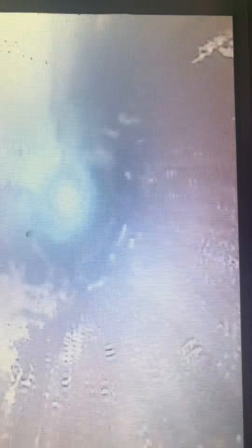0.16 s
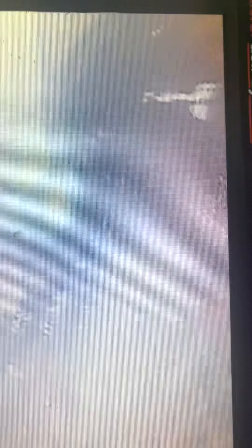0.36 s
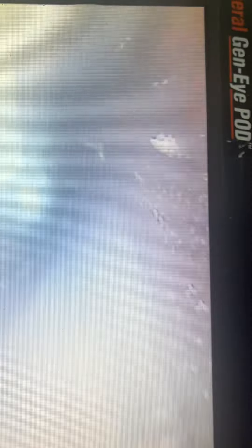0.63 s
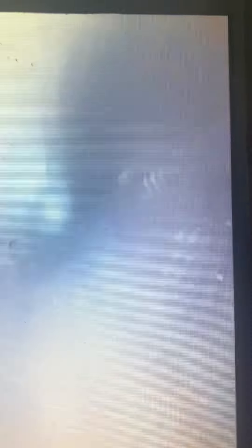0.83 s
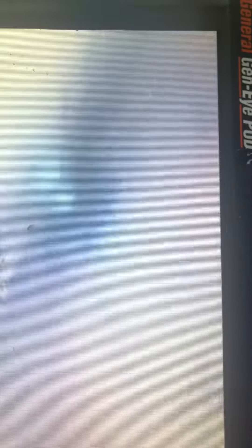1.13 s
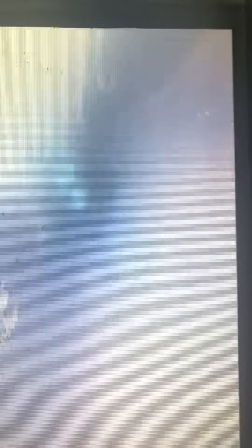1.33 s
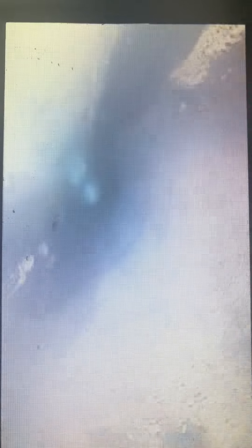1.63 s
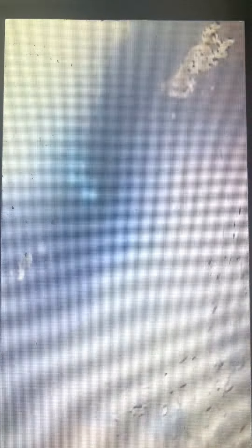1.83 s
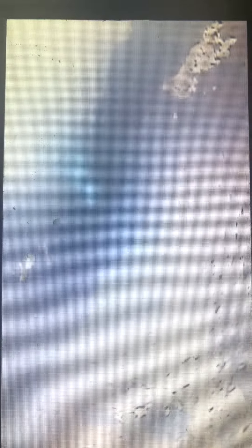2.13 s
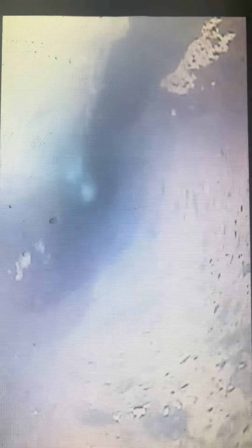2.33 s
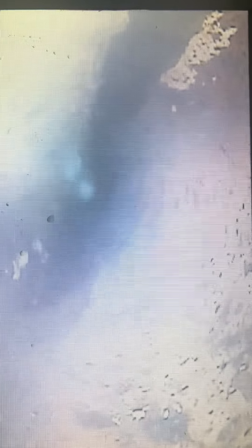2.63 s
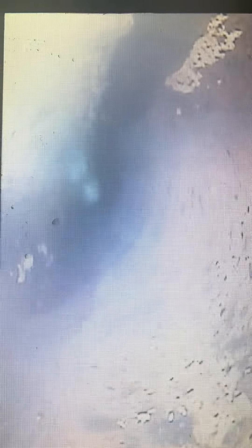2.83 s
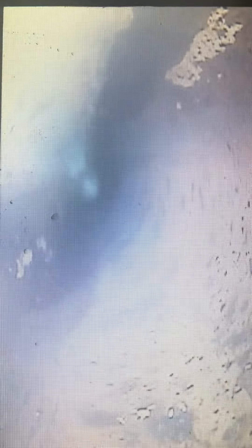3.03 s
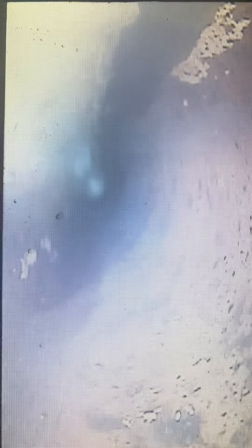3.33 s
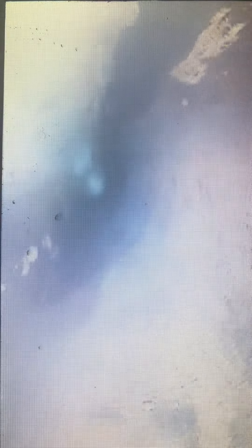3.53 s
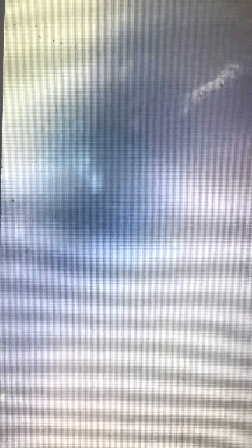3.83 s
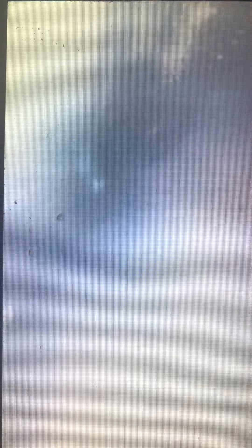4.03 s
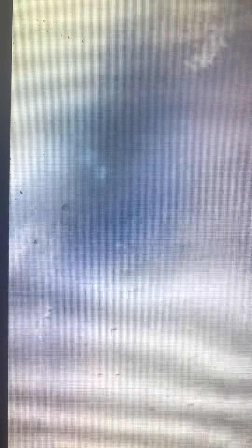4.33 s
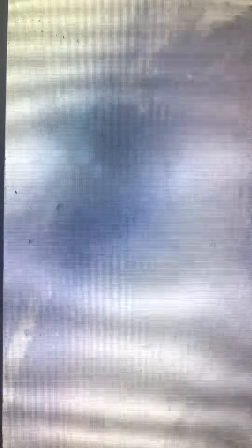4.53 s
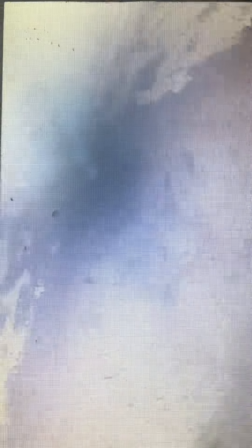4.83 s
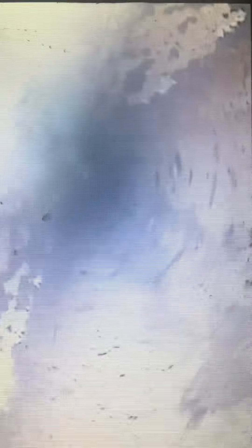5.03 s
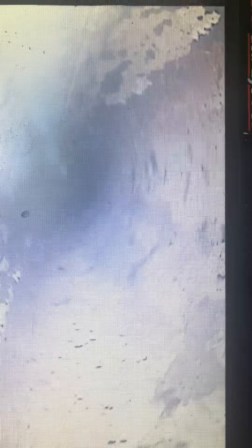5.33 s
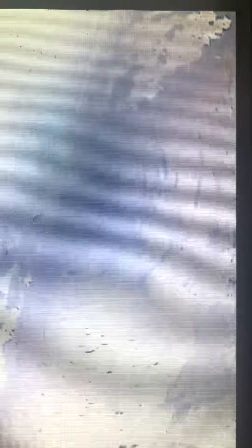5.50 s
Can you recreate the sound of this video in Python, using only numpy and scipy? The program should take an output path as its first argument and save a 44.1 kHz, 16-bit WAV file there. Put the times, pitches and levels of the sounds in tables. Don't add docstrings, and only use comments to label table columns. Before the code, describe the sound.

A stiff wet cable is dragged by hand along a drain pipe, captured close with uneven stereo colour. Low rumble with a hollow hum and soft steady hiss run throughout, with faint bubbles, drops and wet ticks. From 0.2 to 1.5 seconds the first pull rubs with a dull, grainy rasp around the low mids, catching in quick throbs; knocks crowd together around 0.7 to 0.95, with more at 1.4 and 1.5. It settles, leaving light hand rustles and separate hollow clacks near 2.3 and 2.5. Around 3 seconds it is nearly still, with faint catches. At 3.8 a very bright wet snap and the hardest thud strike together, starting the second pull, which groans and throbs strongest from 4.0 to 4.5 with singing pipe tones. A heavy booming knock lands at 4.6, another double knock at 5.1, and a last clack at 5.57 as the rubbing fades.

```python
import sys
import numpy as np
from scipy import signal
from scipy.fft import rfft, irfft, next_fast_len
from scipy.io import wavfile
from scipy.ndimage import uniform_filter1d

SR = 44100
rng = np.random.default_rng(int(sys.argv[2]) if len(sys.argv) > 2 else 0)


def decibels_to_gain(level_db):
    exponent = np.asarray(level_db, float) / 20
    return 10 ** exponent


def generate_wav(signal):
    frames = np.transpose(np.atleast_2d(signal))
    scaled = np.clip(frames, -1, 1) * 32767
    pcm = np.round(scaled).astype(np.int16)
    wavfile.write(sys.argv[1], SR, pcm)


N = 249606


def rms_one(x):
    return x / np.sqrt(np.mean(x ** 2) + 1e-20)


def at_hz(points, hz):
    point_hz, value = np.array(points).T[:2]
    return np.interp(np.log(hz), np.log(point_hz), value)


def bandpass(x, low_hz, top_hz, order=2):
    return signal.sosfilt(signal.butter(order, [low_hz, top_hz], "band", fs=SR, output="sos"), x)


def drift(rate):
    step = 40
    r = np.exp(-2 * step * np.pi * rate / SR)
    slow = signal.lfilter([1], [1, -2 * r, r * r], rng.standard_normal(N // step + 2002))[2000:]
    return np.interp(np.arange(N) / step, np.arange(len(slow)), rms_one(slow))


def ring(force, hz, t60):
    r = decibels_to_gain(-60 / (t60 * SR))
    w = 2 * np.pi * hz / SR
    return signal.lfilter([0, np.sin(w)], [1, -2 * r * np.cos(w), r * r], force + 1e-18)


def random_clicks(per_s, spread_db):
    sizes = decibels_to_gain(spread_db * np.minimum(rng.exponential(size=(2, N)), 5))
    sizes = sizes * rng.choice([-1, 1], (2, N))
    return sizes * (rng.random((2, N)) < per_s / SR)


def struck_resonance(rows, rise_s, fall_s, cycles, trim_db):
    t = np.arange(4000) / SR
    out = np.zeros((2, N + len(t)))
    shove = (1 - np.exp(-t / rise_s)) * np.exp(-t / fall_s)
    for start, db, hz in rows:
        rough = rng.standard_normal((2, len(t))) * shove
        throb = ring(ring(rough, hz, cycles / hz), hz, cycles / hz / 4)
        at = round(start * SR)
        out[:, at:at + len(t)] += decibels_to_gain(db + trim_db) * throb / np.abs(throb).max(axis=1, keepdims=True)
    return out[:, :N]


def bursts(rows, octaves, decay_s):
    t = np.arange(700) / SR
    out = np.zeros((2, N + len(t)))
    decay = np.exp(-t / decay_s) + .2 * np.exp(-t / .009)
    for start, db, hz in rows:
        low_hz, top_hz = np.clip([hz * 2 ** -octaves, hz * 2 ** octaves], 500, 18000)
        snap = bandpass(rng.standard_normal((2, len(t))) * decay, low_hz, top_hz)
        at = round((start + 0.000896) * SR)
        out[:, at:at + len(t)] += decibels_to_gain(db + 11.0) * snap / np.abs(snap[0]).max()
    return out[:, :N]


def swells(rows, octaves):
    t = np.arange(N) / SR
    out = np.zeros((2, N))
    slips = random_clicks(3000, spread_db=2.5)
    for centre, half, db, hz in rows:
        near = np.abs(t - centre) < half
        grain = rms_one(bandpass(slips[:, near], hz * 2 ** -octaves, hz * 2 ** octaves))
        out[:, near] += decibels_to_gain(db) * (1 - ((t[near] - centre) / half) ** 2) * grain
    return out


# time in seconds, level in dB.
PULL_EFFORT = [(0.0, -46.5), (0.14, -40), (0.58, -36), (0.79, -33.5), (0.87, -31.5), (1.01, -38),
               (1.43, -35), (1.53, -50), (2.22, -43), (2.49, -54), (3.15, -62.5), (3.52, -55), (3.6, -42),
               (3.92, -33), (4.05, -28.5), (4.48, -32), (4.81, -43.5), (5.66, -58)]
# centre in seconds, half length in seconds, level in dB.
CABLE_SHIFTS = [
    (0.43, 0.072, -38),
    (1.76, 0.11, -45),
    (2.66, 0.1, -47.5),
    (2.855, 0.026, -47),
    (3.43, 0.058, -47.5),
    (4.942, 0.043, -44.5),
]
# pitch in Hz, level in dB, ring time t60 in seconds.
PIPE_MODES = [(145.4, 4, 0.29), (188.3, 1, 0.27), (211, -1.5, 0.074), (238, -4, 0.01), (336.3, 1, 0.29),
              (369.8, 6.5, 0.18), (423, 0.5, 0.13), (483.7, 13.5, 0.042), (518, -12, 0.17),
              (550.3, 2, 0.12), (611, -0.5, 0.031), (738, -13, 0.076), (695, -7, 0.0054),
              (885, -17.5, 0.053), (930.5, -17.5, 0.17), (1070, -16, 0.0088), (1185, -21.5, 0.42),
              (1216, -14.5, 0.11), (1316, -21, 0.37), (1445, -3, 0.026), (1680, -10.5, 0.022),
              (1900, -7.5, 0.023), (1996, -12.5, 0.031), (2724, -8.5, 0.0061), (3175, -6, 0.011),
              (4600, -17.5, 0.011)]


def rubbing():
    t = np.arange(N) / SR
    power = decibels_to_gain(2 * np.interp(t, *np.transpose(PULL_EFFORT)))
    for centre, half, db in CABLE_SHIFTS:
        power = power + decibels_to_gain(2 * db) * np.clip(1 - ((t - centre) / half) ** 2, 0, 1)
    rub_db = 10 * np.log10(power)
    rasp_db = -50 + 0.59 * (rub_db + 40.5)
    drone_db = -44.5 + 0.59 * (rub_db + 43)
    slips = random_clicks(4000, spread_db=2.0) * decibels_to_gain(1.2 * drift(14))
    modes = []
    for hz, db, t60 in PIPE_MODES:
        wander = decibels_to_gain(db + 1.5 * drift(12))
        modes.append((hz, wander * rms_one(ring(slips, hz, t60))))
    drone = rms_one(sum(v for hz, v in modes if hz < 230))
    body = sum(v for hz, v in modes if 250 <= hz < 900)
    body = rms_one(bandpass(body, 310, 640, order=4))
    rasp = rms_one(sum(v for hz, v in modes if hz >= 900))
    return decibels_to_gain(rub_db - 3.5) * body + decibels_to_gain(rasp_db) * rasp + decibels_to_gain(drone_db) * drone


# frequency in Hz, level in dB per Hz.
AIR_SPECTRUM = [(25, -85), (45, -62), (70, -55.5), (100, -59), (170, -64.5), (250, -76), (500, -78),
                (1050, -91.5), (1950, -86), (2250, -87), (5500, -83.5), (7000, -86.5), (14000, -89.5),
                (16000, -97)]


def background():
    hz = np.maximum(np.fft.rfftfreq(N, 1 / SR), 1)
    air = rms_one(irfft(rfft(rng.standard_normal((2, N))) * decibels_to_gain(at_hz(AIR_SPECTRUM, hz)), N))
    rumble = signal.sosfiltfilt(signal.butter(2, 800, fs=SR, output="sos"), air)
    hiss = air - rumble
    hum = rms_one(ring(air, 79, 0.42) + 1.2 * ring(air, 95, 0.4))
    rumble = rumble + decibels_to_gain(-6.0) * hum
    hiss = hiss - decibels_to_gain(-6.0) * hum
    return decibels_to_gain(-36.5) * (rumble * decibels_to_gain(1.2 * drift(5.5)) + hiss * decibels_to_gain(.8 * drift(22)))


def trickle():
    pops = random_clicks(260, spread_db=2.5) * decibels_to_gain(4.9 * drift(3.7))
    pitches = np.geomspace(2100, 15000, 14)
    dealt = rng.integers(0, len(pitches), N)
    cycles = 40
    return decibels_to_gain(-61) * rms_one(sum(ring(pops * (dealt == k), hz, cycles / hz) for k, hz in enumerate(pitches)))


def faint_ticks():
    decay = np.exp(-1 / (.0012 * SR))
    level = signal.lfilter([1], [1, -decay], np.abs(random_clicks(30, spread_db=2.2)[0]))
    high = signal.butter(2, 3000, "high", fs=SR, output="sos")
    return decibels_to_gain(-64.0) * level * signal.sosfilt(high, rng.standard_normal((2, N)))


# start in seconds, peak level in dB, pitch in Hz.
WET_SPECKS = [(0.0323, -41.5, 4000), (0.0787, -39.5, 4130), (0.2977, -45, 4000), (0.7198, -41, 3900),
              (0.762, -43.5, 4800), (0.8785, -39, 3300), (0.933, -36, 3000), (0.946, -41, 4100),
              (1.056, -50, 4000), (1.1932, -40, 4300), (1.255, -44, 7600), (1.4102, -35.5, 8200),
              (1.4596, -42, 8000), (1.498, -42, 7900), (1.5229, -41.5, 4000), (1.6232, -44, 8250),
              (2.0527, -44, 8250), (2.1685, -42.5, 9400), (2.5262, -40, 7750), (2.528, -44, 14000),
              (2.543, -41, 14500), (2.543, -44, 8500), (2.657, -46, 9500), (2.75, -47, 4400),
              (2.862, -48, 7500), (3.1637, -45, 3980), (3.2141, -44, 4200), (3.4326, -47, 4000),
              (3.4805, -43.5, 8300), (3.675, -42, 4200), (3.975, -44, 9800), (4.4139, -42, 8800),
              (4.4912, -45, 9100), (4.5226, -52, 4000), (4.591, -42, 8300), (4.7172, -43, 4200),
              (5.033, -44.5, 3800), (5.09, -38, 3100), (4.591, -41, 3300), (5.2719, -46, 9100)]


def specks():
    return bursts(WET_SPECKS, octaves=0.5, decay_s=0.0022)


# start in seconds, peak level in dB.
GRIT_CRACKS = [(0.068, -36), (0.1735, -37.5), (0.335, -35.5), (0.4357, -38.5), (0.608, -39.5), (0.873, -32),
               (0.9196, -37.5), (1.39, -37), (1.41, -39.5), (1.644, -38), (2.089, -39.5), (3.024, -41),
               (3.8382, -28.5), (4.5902, -39), (5.088, -32.5), (5.353, -38.5), (0.95, -46)]


def grit():
    return bursts([(*row, 4300) for row in GRIT_CRACKS], octaves=.75, decay_s=.0022)


# start in seconds, peak level in dB.
FILM_SNAPS = [
    (0.177, -48),
    (0.271, -32.5),
    (0.336, -39),
    (0.574, -37),
    (1.19, -36),
    (1.711, -36),
    (2.3595, -39),
    (2.956, -33.5),
    (3.783, -35.5),
    (3.8145, -21),
]


def film_snaps():
    return bursts([(*row, 10600) for row in FILM_SNAPS], octaves=1, decay_s=0.0014)


# centre in seconds,
# half length in seconds, level in dB, pitch in Hz.
HAND_RUSTLES = [(0.3, .1, -58, 8000), (0.9, .07, -60, 4500), (1.22, .05, -51, 3900), (1.45, .08, -55, 8200),
                (1.982, 0.089, -56, 1550), (2.15, .08, -60, 8500), (2.25, .06, -56, 1450),
                (2.7, .06, -53, 8500), (2.72, 0.093, -61, 4300), (2.75, .13, -60, 1900),
                (3.5, .06, -60, 8500), (3.7, .12, -53, 4300), (3.7, .12, -56, 8500), (3.72, .08, -56, 1400),
                (4.3, .25, -52, 1050), (4.25, 0.27, -56, 1950), (5.28, .08, -59, 8500),
                (0.45, 0.17, -51, 760), (1.15, 0.24, -47, 556), (3.1, 0.089, -54, 680),
                (3.65, 0.22, -45, 50), (4.75, .2, -50, 48), (0.75, .25, -50, 48), (3.9, .1, -42, 150),
                (3.68, .12, -60, 2100), (1.3, .1, -62, 2600), (2.05, .1, -58, 2400), (5.15, .06, -54, 1530),
                (2.4, .06, -53, 450)]


def hand_rustles():
    return swells(HAND_RUSTLES, octaves=0.22)


# start in seconds, peak level in dB, pitch of the contact in octaves above the
PIPE_KNOCKS = [(0.246, -18.5, 2.43, 0.44), (0.368, -32, 1.2, 0.46), (0.433, -23.5, 1.34, 0.51),
               (0.574, -22.5, 0.97, 0.42), (0.723, -19.5, 0.37, 2.7), (0.768, -12, 0.48, 0.67),
               (0.826, -16, 0.86, 0.73), (0.874, -24.5, 0.22, 2), (0.923, -19, 0.17, 1),
               (0.948, -27.5, 1.9, 2.4), (1.056, -23.5, 1.3, 0.65), (1.095, -26, 1.36, 0.67),
               (1.233, -27.5, 1.2, 0.49), (1.389, -17.5, 0.86, 0.89), (1.47, -21, 1.76, 0.82),
               (1.623, -39.5, 3.9, 1), (1.848, -33, 1.9, 0.73), (2.121, -30, 0.78, 1.53),
               (2.311, -23, 2.1, 12), (2.459, -21.5, 1.73, 0.74), (2.801, -34.5, 2.1, 0.57),
               (3.177, -30, 1.15, 1.28), (3.839, -17, 3.1, 2.5), (4.396, -28, 1.2, 0.3),
               (4.591, -17.5, 0.23, 2.33), (4.824, -41, 2.2, 0.9), (5.086, -16, 1.17, 0.97),
               (5.123, -22, 1.72, 0.64), (5.293, -38, 2.1, 0.58), (5.57, -24, 2.47, 1.6)]
GROUP_PITCH = [0, 1.2, 2.2, 3.2]


def knocks():
    start_s, peak_db, pitch, breadth = np.transpose(PIPE_KNOCKS)
    breadth = np.maximum(breadth, .2)
    colour = [-20 * np.log10(1 + ((at - pitch) / breadth) ** 2) for at in GROUP_PITCH]
    t = np.arange(7000) / SR
    rough = rng.standard_normal((len(start_s), 2, len(t)))
    chance = rng.standard_normal((len(start_s), 2, len(PIPE_MODES)))
    far = np.clip((colour[3] + 11) / 7, 0, 1)
    groups = np.zeros((4, len(start_s), 2, len(t)))
    for m, (hz, db, t60) in enumerate(PIPE_MODES):
        late = max(6.0 / hz - .0105, 0) + .007 * far * np.clip((1400 - hz) / 600, 0, 1)
        since = np.maximum(t - late[:, None, None], 0)
        contact = (1 - np.exp(-since / 0.000093)) * np.exp(-since * (70 + 0.022 * hz))
        rung = ring(rough * contact, hz, 0.71 * t60)
        rung = rung / np.abs(rung).max(axis=2, keepdims=True)
        groups[np.searchsorted([250, 600, 1100], hz)] += decibels_to_gain(db + 2.0 * chance[..., m, None]) * rung
    out = np.zeros((2, N + len(t)))
    lifts_db = [0.2, 3.8, 0.25, 4.05]
    bands_hz = [(90, 260), (300, 720), (600, 1500), (1000, 3300)]
    for group, rel_db, lift_db, band in zip(groups, colour, lifts_db, bands_hz):
        group = bandpass(group, *band)
        loudest = np.sqrt(uniform_filter1d(group ** 2, size=600).max(axis=2, keepdims=True))
        group = group / loudest * decibels_to_gain(peak_db + rel_db + lift_db - 8.5)[:, None, None]
        for start, knock in zip(start_s, group):
            at = round((start - .0015) * SR)
            out[:, at:at + len(t)] += knock
    return out[:, :N]


# start in seconds, peak level in dB, pitch in Hz.
FIRST_CONTACTS = [(0.247, -28, 1010), (0.721, -26, 1500), (2.311, -26, 1450), (2.311, -30, 2030),
                  (2.46, -32, 760), (3.836, -23, 2030), (3.84, -25, 1300), (4.589, -25, 1570),
                  (4.59, -30, 1120), (5.084, -33, 1930), (5.568, -26, 1440), (5.568, -34, 2000),
                  (1.47, -32, 880), (1.39, -34, 2010), (0.88, -32, 1500), (1.058, -31, 620),
                  (1.3, -32, 600), (0.826, -26, 484)]


def clacks():
    return struck_resonance(FIRST_CONTACTS, rise_s=.0005, fall_s=0.0028, cycles=16.6, trim_db=-2.5)


# start in seconds, peak level in dB.
FAR_DROPS = [(0.248, -35.5), (0.856, -42), (1.0824, -40), (1.97, -42), (2.137, -38.5), (2.505, -42),
             (3.047, -41), (3.339, -46), (3.511, -45), (3.89, -39), (4.186, -40), (4.841, -42),
             (5.035, -40), (5.233, -41), (5.2905, -42)]


def drops():
    return bursts([(*row, 8650) for row in FAR_DROPS], octaves=0.76, decay_s=0.0023)


# start in seconds, peak level in dB, pitch in Hz.
PIPE_BOOMS = [(0.25, -32.5, 150), (1.1, -28, 143), (2.32, -23, 146), (3.872, -22, 150), (4.625, -17.5, 144),
              (4.61, -20, 336), (5.095, -25, 150), (5.125, -24, 190), (5.1, -23, 346), (4.1, -32, 1165),
              (3.87, -38, 1210)]


def booms():
    return struck_resonance(PIPE_BOOMS, rise_s=.003, fall_s=0.0086, cycles=31, trim_db=-3.5)


# centre in seconds, half length in seconds, level in dB, pitch in Hz.
SINGING_MODES = [(0.45, .17, -40, 550), (0.58, 0.28, -58, 2000), (1.2, 0.26, -44, 549),
                 (4.18, 0.32, -53.5, 2005), (4.22, 0.34, -52.5, 1190), (4.15, 0.28, -50.5, 1430),
                 (4.25, .3, -41.5, 470), (3.7, .13, -56, 2000), (3.5, .08, -38, 147),
                 (4.35, 0.26, -46.5, 340), (4.9, .12, -49.5, 400), (1.5, 0.056, -49.5, 1056),
                 (1.8, .15, -54, 760), (2.29, 0.11, -53, 756), (2.0, 0.26, -44, 95), (0.75, .4, -44, 96),
                 (3.94, .4, -47, 95)]


def singing():
    return swells(SINGING_MODES, octaves=0.065)


# start in seconds, peak level in dB, pitch in Hz.
SKIN_CATCHES = [(0.295, -41, 434), (0.342, -28.5, 476), (0.384, -21.5, 547), (0.464, -22, 545),
                (0.519, -22.5, 534), (0.552, -22, 493), (0.594, -22.5, 430), (0.62, -22.5, 540),
                (0.644, -19, 462), (0.674, -34, 606), (0.883, -23, 611), (1.045, -21.5, 362),
                (1.123, -26.5, 520), (1.145, -28, 386), (1.209, -37, 536), (1.287, -32, 476),
                (1.333, -31, 475), (1.658, -34, 620), (1.75, -38, 362), (2.585, -29, 468),
                (2.643, -33.5, 617), (2.683, -36, 530), (3.004, -39, 360), (3.106, -31, 537),
                (3.27, -42, 990), (3.396, -33, 492), (3.564, -32, 397), (3.603, -31.5, 464),
                (3.671, -30.5, 358), (3.737, -33, 437), (3.779, -33, 463), (3.918, -42, 460),
                (3.969, -23, 410), (4.019, -37, 510), (4.073, -21.5, 466), (4.114, -20, 466),
                (4.144, -15, 459), (4.197, -17, 482), (4.227, -17, 475), (4.286, -16.5, 482),
                (4.319, -25, 468), (4.399, -23.5, 498), (4.429, -25, 527), (4.482, -17, 446),
                (4.549, -23.5, 606), (4.94, -36.5, 506), (5.139, -33, 380)]


def catches():
    return struck_resonance(SKIN_CATCHES, rise_s=0.0027, fall_s=0.018, cycles=19.6, trim_db=-4.5)


# start in seconds, peak level in dB, pitch in Hz.
EDGE_NICKS = [(0.352, -43, 1330), (0.4304, -47, 1390), (0.5594, -43, 1330), (0.8475, -33, 2050),
              (0.8734, -28, 1990), (0.8994, -41, 1420), (0.9232, -29, 1970), (0.951, -45, 1350),
              (0.98, -36, 1430), (1.1433, -37, 1470), (2.8534, -36, 1830), (2.8887, -44, 1890),
              (3.3956, -50, 1890), (3.4336, -53, 1870), (3.943, -34, 1440), (3.9789, -42, 1400),
              (4.0507, -34, 1460), (4.11, -33, 1330), (4.144, -33, 1480), (4.1945, -33.5, 1400),
              (4.2982, -32, 1600), (4.3565, -40, 1410), (4.4223, -39, 1960), (4.516, -35.5, 1420)]


def nicks():
    return struck_resonance(EDGE_NICKS, rise_s=0.00043, fall_s=0.0082, cycles=21, trim_db=-2)


# start in seconds, peak level in dB, pitch in Hz.
KNOCK_THUDS = [(0.762, -20, 517), (0.814, -32, 560), (0.949, -22, 534), (1.231, -32, 480),
               (1.471, -16.5, 532), (1.622, -32.5, 2070), (2.315, -20.5, 480), (2.461, -19, 460),
               (3.844, -9, 340), (3.866, -21, 145), (4.589, -16, 676), (4.604, -14, 352),
               (4.826, -30.5, 660), (5.088, -24, 534), (5.11, -18.5, 475), (5.574, -18, 501),
               (5.593, -22.5, 480)]


def thuds():
    return struck_resonance(KNOCK_THUDS, rise_s=0.0018, fall_s=0.0065, cycles=12.2, trim_db=-1.5)


def scene():
    cable = rubbing() + singing() + catches() + nicks()
    blows = knocks() + clacks() + thuds() + booms()
    wet = trickle() + faint_ticks() + specks() + grit() + film_snaps() + drops() + hand_rustles()
    return background() + cable + blows + wet


def thin_stereo(pair, margin_db, weak):
    shift, hop = 1708, 1024
    count = (N + shift) // hop + 1
    mid_side = np.array([pair[0] + pair[1], pair[0] - pair[1]]) / 2
    mid_side = np.pad(mid_side, [(0, 0), (shift, (count + 1) * hop - N - shift)])
    n, k = np.arange(2 * hop)[:, None] + .5, np.arange(hop) + .5
    basis = np.sin(np.pi * n / 2 / hop) * np.cos(np.pi / hop * (n + hop / 2) * k) * np.sqrt(2 / hop)
    blocks = mid_side.reshape(2, -1, hop)
    lines = np.concatenate([blocks[:, :-1], blocks[:, 1:]], axis=2) @ basis
    lines = lines.transpose(0, 2, 1)

    def frame_at(seconds):
        return round((seconds * SR + shift) / hop) - 1

    spared = np.isin(np.arange(count), [frame_at(start) for start, db in FILM_SNAPS])
    edges = np.r_[56:96:8, 96:144:12, 144:176:16, 176:196:20, 196, 216, 240, 264, 292, 320:800:32]
    edges = np.unique(np.r_[edges, 108, 120, 132])
    for low, high in zip(edges, edges[1:]):
        power = np.mean(lines[:, low:high] ** 2, axis=1)
        luck = decibels_to_gain(6.5 * uniform_filter1d(rng.standard_normal(power.shape), size=2))
        kept = (power * luck * decibels_to_gain(2 * margin_db) > power[::-1]) | spared
        strong = lines[:, low:high] ** 2 > weak * power.max(axis=0)
        waver = decibels_to_gain(1.3 * rng.standard_normal(count))
        lines[:, low:high] *= kept[:, None] * (strong | spared) * waver
    loudest_s = max(FILM_SNAPS, key=lambda row: row[1])[0]
    lines[:, 733:] *= np.arange(count) == frame_at(loudest_s)
    frames = lines.transpose(0, 2, 1) @ basis.T
    out = np.pad(frames[..., :hop], [(0, 0), (0, 1), (0, 0)])
    out = out + np.pad(frames[..., hop:], [(0, 0), (1, 0), (0, 0)])
    mid, side = out.reshape(2, -1)[:, shift:shift + N]
    return np.array([mid + side, mid - side])


def roll_off(x):
    return signal.sosfilt(signal.butter(12, 16500, fs=SR, output="sos"), x)


# frequency in Hz, lead of the left in radians.
LEFT_LEAD = [(0, 0), (520, -.95), (1000, 0), (1800, .1), (2700, 2.7), (3400, 2.9), (4200, 1.2), (5400, 2.5),
             (5700, np.pi), (6400, np.pi), (8300, 2 * np.pi), (9700, 2 * np.pi), (11600, 3 * np.pi),
             (13400, 3 * np.pi), (14600, 4 * np.pi)]
# frequency in Hz, left over right in dB.
LEFT_TILT = [(60, 1), (140, -2), (330, -1.5), (500, -3.5), (770, -9.5), (1170, -3.5), (2700, -1),
             (6000, 0.7), (14000, 0.7)]
# frequency in Hz, left-right likeness from 0 to 1.
PORT_LIKENESS = [(60, .999), (300, .995), (800, .92), (1600, .89), (2300, .7), (3000, .82), (4100, .45),
                 (5300, .7), (5700, .98), (6300, .98), (6900, .85), (7500, .65), (8500, .94), (9600, .95),
                 (10700, .7), (11800, .98), (13300, .97), (14100, .65), (14800, .97)]


def record(dry):
    size = next_fast_len(N + 4096)
    hz = np.maximum(np.fft.rfftfreq(size, 1 / SR), 1)
    shared, apart = rfft(dry, size)
    alike = np.clip(at_hz(PORT_LIKENESS, hz), 0, 1)
    shared = shared * np.sqrt((1 + alike) / 2)
    apart = apart * np.sqrt((1 - alike) / 2)
    lead = np.interp(hz, *np.transpose(LEFT_LEAD))
    skew = decibels_to_gain(at_hz(LEFT_TILT, hz) / 2) * np.exp(.5j * lead)
    pair = irfft([(shared + apart) * skew, (shared - apart) / skew], size)[:, :N]
    pair = signal.sosfilt(signal.cheby2(12, 40, 16300 * 1.02, fs=SR, output="sos"), pair)
    pair = signal.sosfilt(signal.butter(3, 42, "high", fs=SR, output="sos"), pair)
    mix = thin_stereo(pair, margin_db=10.8, weak=.04)
    return roll_off(mix)


dry = scene()
out = record(dry)
generate_wav(out)
```